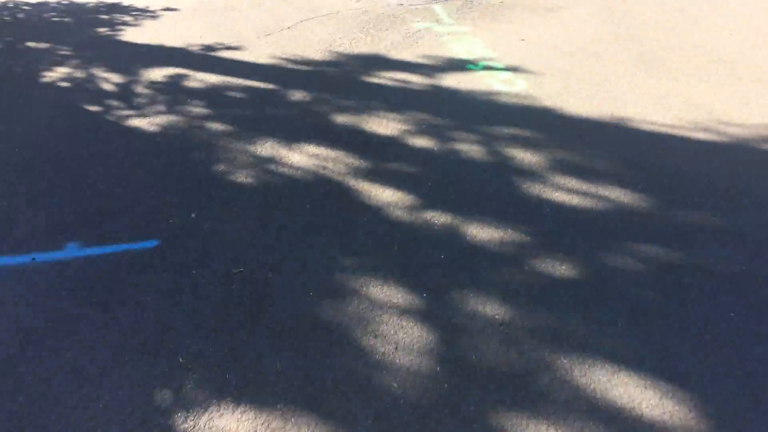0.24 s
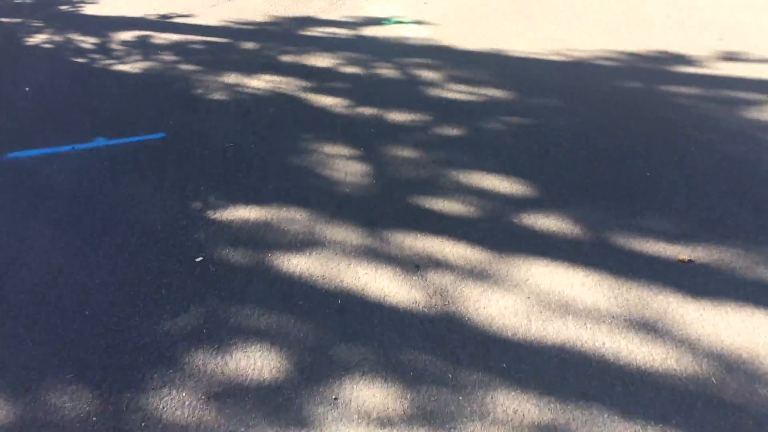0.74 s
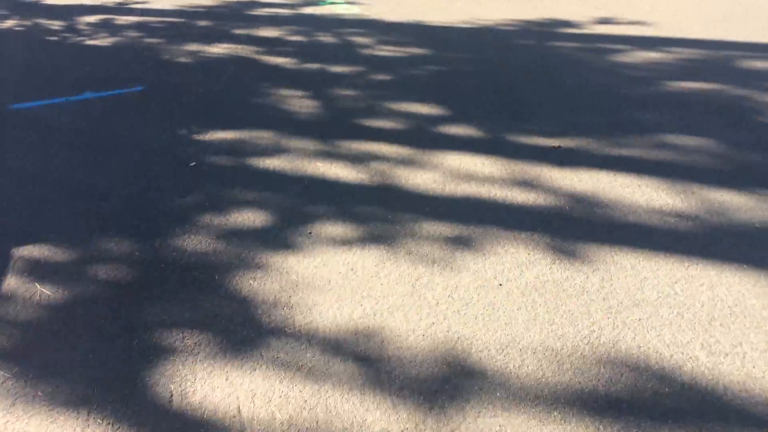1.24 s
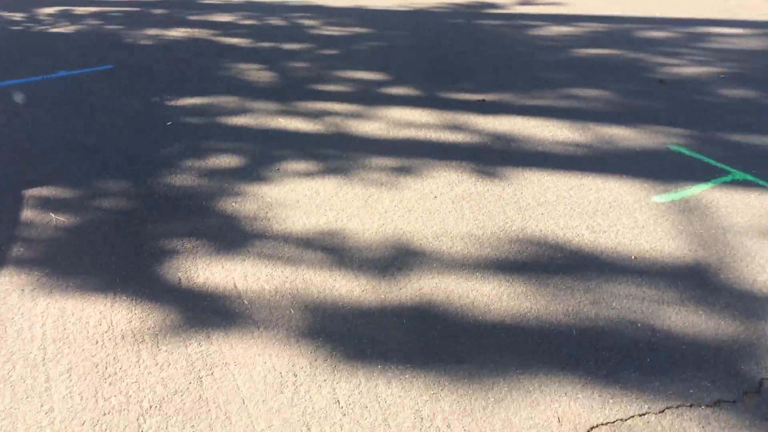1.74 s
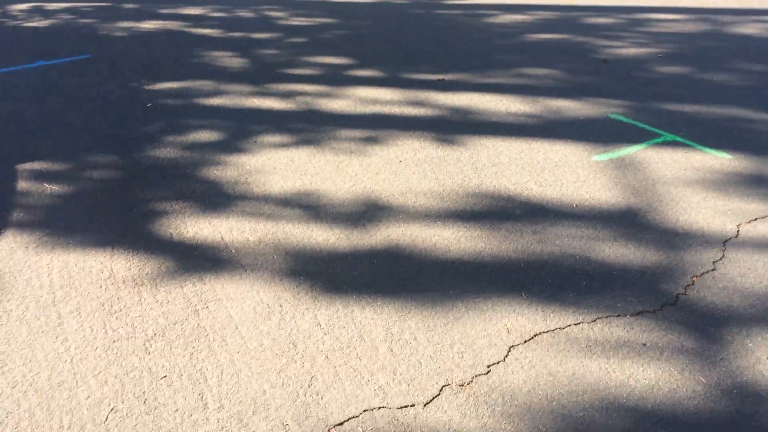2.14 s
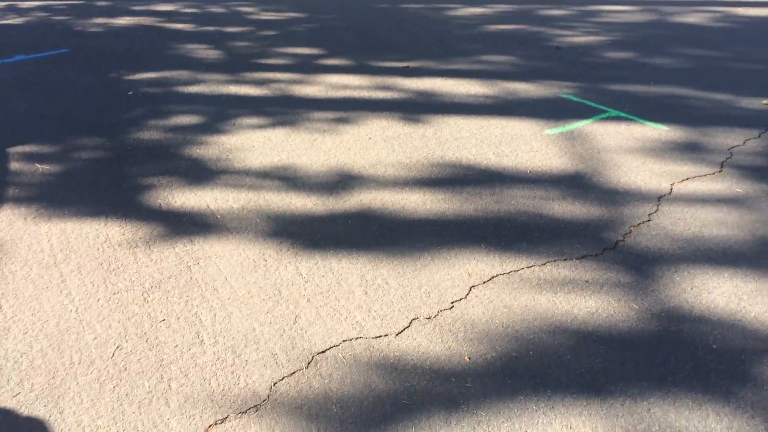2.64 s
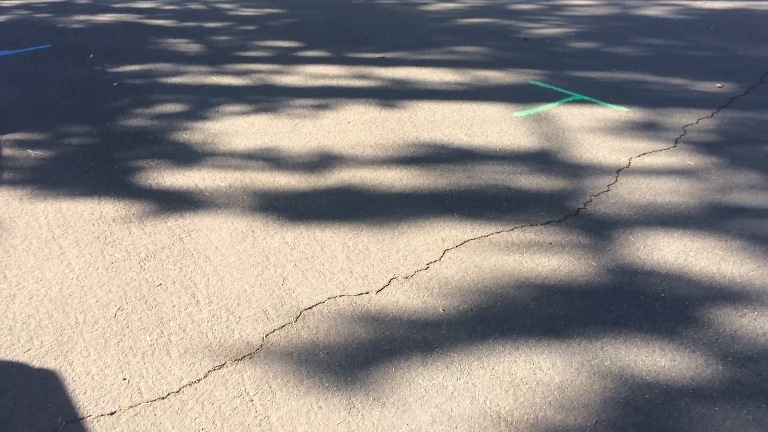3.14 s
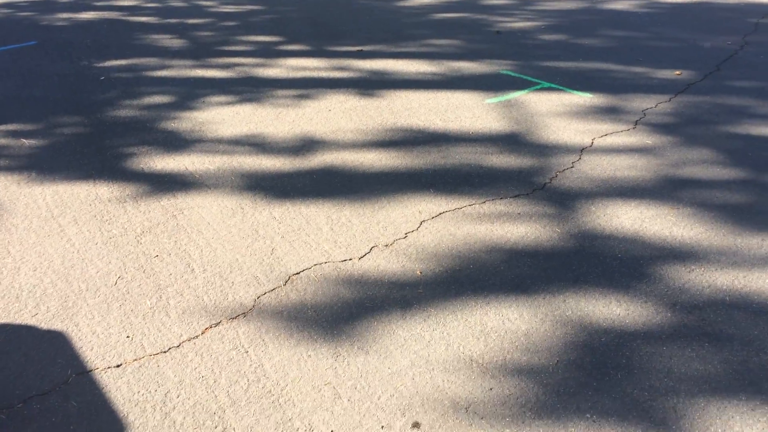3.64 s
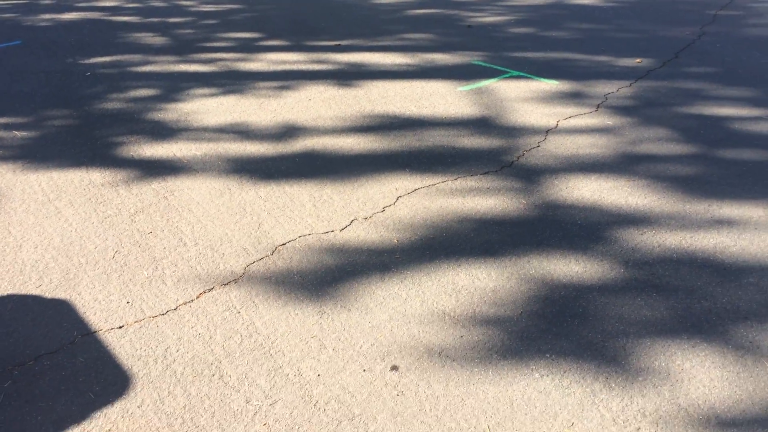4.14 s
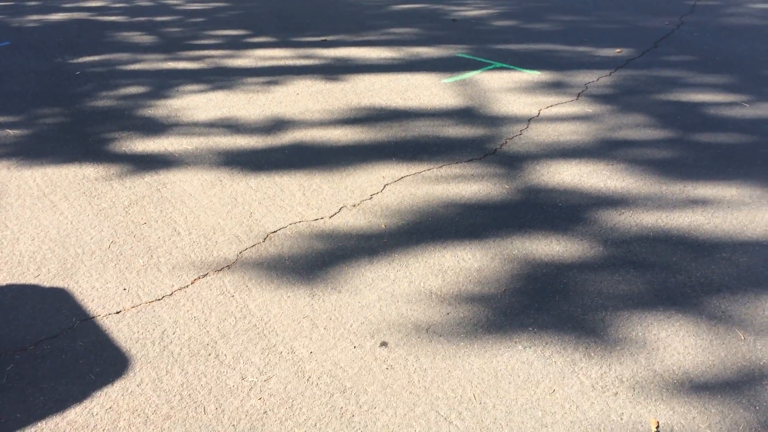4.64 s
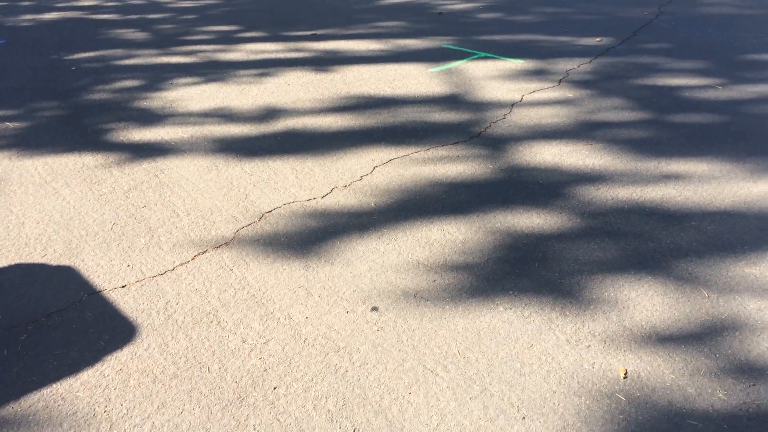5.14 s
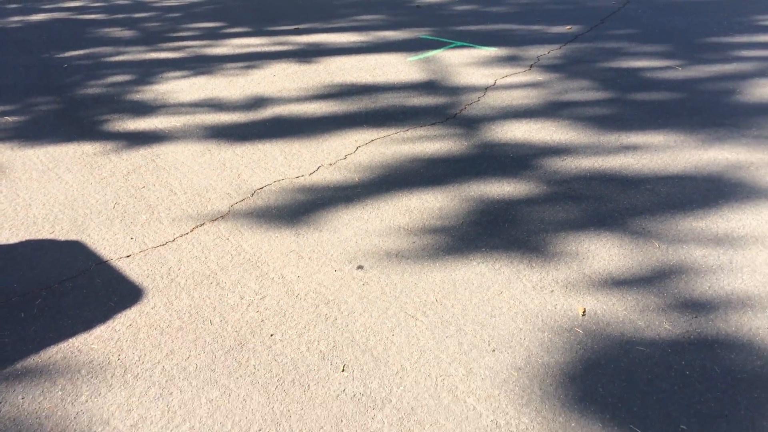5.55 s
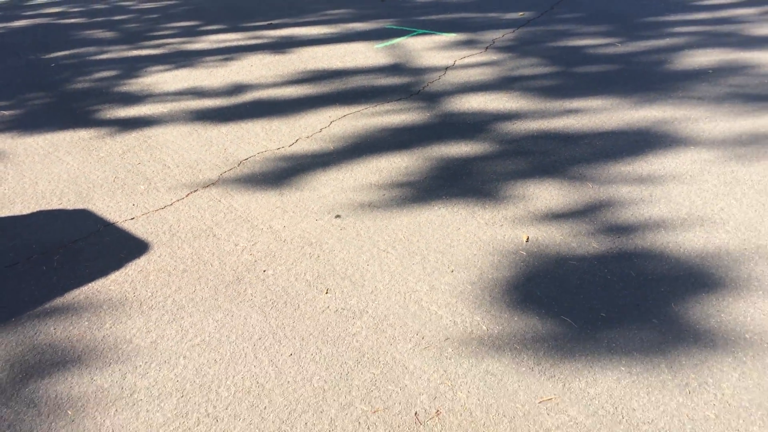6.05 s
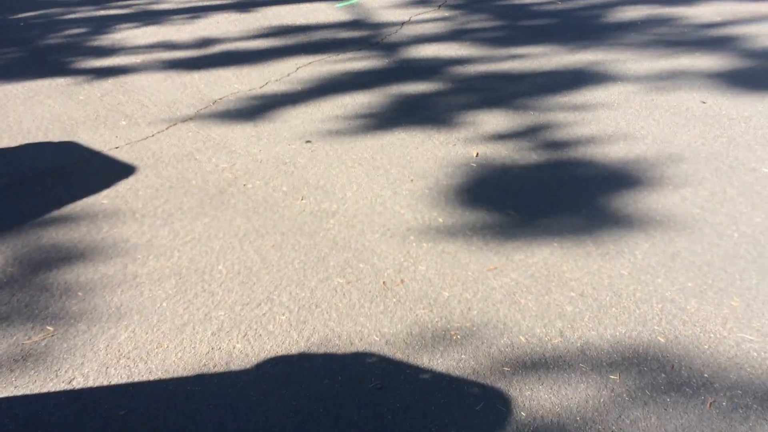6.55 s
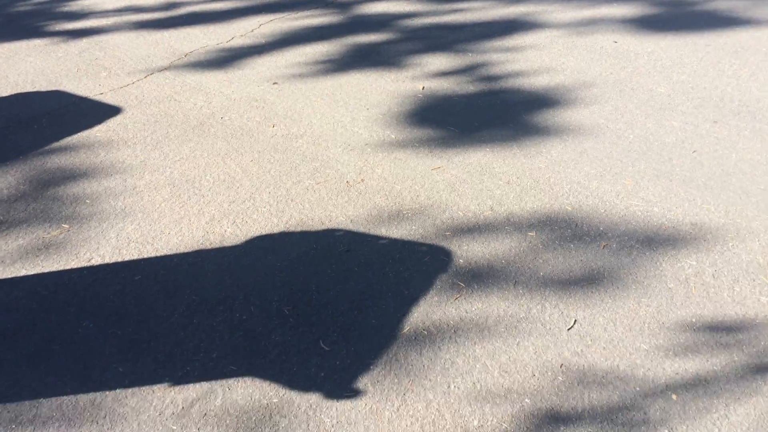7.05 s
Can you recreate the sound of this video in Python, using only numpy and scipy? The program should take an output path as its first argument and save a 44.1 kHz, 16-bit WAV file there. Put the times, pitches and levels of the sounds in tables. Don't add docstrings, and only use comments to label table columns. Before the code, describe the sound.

A small four-cylinder car idles in a lumpy, uneven burble, then revs twice with a raspy exhaust bark and coasts down, recorded by handheld phone outdoors.

```python
import sys
import numpy as np
from scipy import signal
from scipy.fft import rfft, irfft, next_fast_len
from scipy.io import wavfile
from scipy.ndimage import uniform_filter1d, map_coordinates

SR = 44100
rng = np.random.default_rng(int(sys.argv[2]) if len(sys.argv) > 2 else 0)


def attenuation_scalar(level_db):
    decades = np.asarray(level_db, float) / 20
    return 10 ** decades


def store_wav(level_fs):
    pcm = np.round(np.clip(np.atleast_2d(level_fs), -1, 1) * 32767)
    wavfile.write(sys.argv[1], SR, pcm.T.astype(np.int16))


N = 321048


def unit(x):
    return x / np.sqrt(np.mean(x ** 2) + 1e-20)


def along(points, hz):
    f, v = np.transpose(points)
    return attenuation_scalar(np.interp(np.log(hz + 1), np.log(f + 1), v, left=-120))


def curves(rows):
    s, *cols = np.transpose(rows)
    return [np.interp(np.arange(N) / SR, s, c) for c in cols]


def wobble(rate, count=N):
    coarse = np.arange(0, count + 32, 32)
    knots = rng.standard_normal(int(N * rate / SR) + 4)
    return np.interp(np.arange(count), coarse, map_coordinates(knots, [coarse * rate / SR]))


def filtered(x, response):
    m = next_fast_len(len(x) + SR // 2)
    return irfft(rfft(x, m) * response(np.fft.rfftfreq(m, 1 / SR)), m)[:len(x)]


def mode(f, hz, width):
    return 1j * f * width / (hz * hz - f * f + 1j * f * width)


def rush(response, patchy_db):
    z = signal.stft(rng.standard_normal(N), nperseg=512)[2]
    field = uniform_filter1d(rng.standard_normal(z.shape), size=5, axis=0)
    field = uniform_filter1d(field, size=10, axis=1)
    patchy = signal.istft(z * attenuation_scalar(patchy_db * unit(field)), nperseg=512)[1][:N]
    return unit(filtered(patchy, response))


def puffs(train, length_ms, lead_ms):
    u = np.arange(SR // 20) / SR * 1000 / length_ms
    return signal.fftconvolve(train, u * np.exp(1 - u))[round(lead_ms * SR / 1000):][:N]


def placed(pieces):
    out = np.zeros(N + 4 * SR)
    for s, piece in pieces:
        out[round(abs(s) * SR):][:len(piece)] += piece
    return out[:N]


def swell(length, db, edge):
    u = np.arange(round(length * SR)) / (length * SR)
    return attenuation_scalar(db) * np.sin(np.pi / 2 * np.clip(np.minimum(u, 1 - u) / edge, 0, 1)) ** 2


def swells(rows, edge):
    return placed((s, swell(length, db, edge)) for s, length, db in rows)


def sing(hz, gain, waver_hz, rate):
    strength = gain * attenuation_scalar(3.0 + 0.81 * wobble(14, count=len(gain)))
    pitch = hz + waver_hz * wobble(rate, count=len(gain))
    return strength * np.sin(2 * np.pi * np.cumsum(pitch) / SR)


# [t/s, exhaust strokes per s]
SPEED = [(0, 25.16), (.99, 27.48), (1.1, 26.98), (2.588, 26.74), (3.136, 28.57), (3.378, 38.73),
         (3.547, 40.3), (3.725, 49.15), (4.161, 48.23), (4.514, 42.52), (4.737, 47.7), (4.931, 46.55),
         (5.17, 56.86), (5.36, 58.58), (5.719, 43.37), (6.595, 24.14), (6.921, 25.62), (7.28, 39.35)]


def crank():
    return np.cumsum(curves(SPEED)[0]) / SR - .226


# [t/s, level/dB]
PUMPING = [(0, -22), (.4, -20.5), (2.8, -21), (3.1, -22), (3.27, -17.5), (3.48, -21), (3.62, -18.5),
           (4.3, -16.5), (4.6, -21.5), (4.8, -15), (5, -18), (5.15, -14.5), (5.5, -17.5), (5.88, -20),
           (6.17, -25), (6.67, -19.5), (7.17, -16.5), (7.28, -21)]
# [start t/s, end t/s, blast level/dB
# at start, blast level/dB at end]
BURNS = [(0, .49, -21, -24), (.49, 3.16, -19, -17.5), (3.25, 3.335, -15, -17.5), (3.34, 3.61, -7, -11),
         (3.68, 3.85, -25, -21), (4.5, 4.7, -45, -45), (5.07, 5.222, -18.5, -14), (5.3, 5.49, -15.5, -13.5),
         (5.86, 5.92, -22, -21), (6, 6.09, -25, -24), (6.09, 6.33, -28, -28), (6.37, 6.56, -22, -20),
         (6.69, 6.95, -20.5, -17.7), (6.96, 7.04, -21.5, -22.5), (7.05, 7.21, -13.5, -15.5),
         (7.21, 7.35, -12.5, -8)]
# [first t/s, last t/s, blast level/dB under a full burn]
LEAN = [(.01, .01, -9), (.088, .088, -20), (.127, .127, -5.5), (.243, .243, -8.5), (.399, .437, -14),
        (.626, .664, -8), (.815, .815, -6), (.886, .886, -11.5), (1.032, 1.032, -12.5), (1.143, 1.143, -11),
        (1.366, 1.404, -8), (1.441, 1.479, -15), (1.627, 1.627, -12), (1.775, 1.775, -16.5),
        (1.885, 1.885, -7.5), (2.147, 2.222, -8.5), (2.483, 2.596, -7), (2.707, 2.707, -11),
        (2.817, 2.817, -5), (2.889, 2.925, -11), (3.031, 3.031, -9), (3.138, 3.138, -8), (3.4, 3.4, -12),
        (5.106, 5.124, -13), (5.385, 5.385, -17.5), (5.475, 5.475, -16.5), (6.391, 6.426, -8),
        (6.864, 6.864, -12), (7.11, 7.11, -8.5), (7.198, 7.198, -7)]


def strokes():
    turns = crank()
    at = np.searchsorted(turns, np.arange(int(turns[-1]) + 2))
    at[-1] = 2 * at[-2] - at[-3]
    chance = rng.standard_normal((len(at), 3))
    at = at + np.round(8 * chance[:, 0]).astype(int)
    when = at / SR
    push_db = curves(PUMPING)[0][np.minimum(at, N - 1)]
    blast_db = push_db - 14.5
    for s0, s1, db0, db1 in BURNS:
        burning = (when >= s0) & (when < s1)
        blast_db = np.where(burning, np.interp(when, [s0, s1], [db0, db1]), blast_db)
    for s0, s1, db in LEAN:
        first, last = np.argmin(abs(when - s0)), np.argmin(abs(when - s1))
        blast_db[first:last + 1] += db
    push, blast = np.zeros((2, N + SR // 4))
    push[at] = attenuation_scalar(push_db)
    blast[at] = attenuation_scalar(blast_db + .7 * chance[:, 1]) + .07 * attenuation_scalar(push_db) * chance[:, 2]
    return push, blast


# [f/Hz, width/Hz, signed gain for push, signed gain for blast]
PIPE = [(42.6, 8, -13.7, -1), (50.8, 24.6, 6.6, -10.3), (112.8, 25.6, 5.8, 56.4),
        (193.25, 65.4, 19.1, -97.2), (195.43, 50.55, -23.6, 124.7), (293.8, 41, -1.5, -1.6)]
# [rise/ms, lead/ms]
PUSH = (.62, 6.14)
# [rise/ms, lead/ms]
BLAST = (2.55, 9.32)
# [f/Hz, level/dB]
MOUTH = [(8, -3.5), (25, -3), (45, 2.5), (80, 4), (120, 3), (200, 4.5), (260, 5.5), (450, -31), (800, -44),
         (1600, -120)]


def valve(f, pulse):
    rise_ms, lead_ms = pulse
    return np.exp(2j * np.pi * f * lead_ms / 1000) / (1 + 2j * np.pi * f * rise_ms / 1000) ** 3


def exhaust(push, blast):
    thin = lambda f: valve(f, PUSH) * sum(g * mode(f, hz, w) for hz, w, g, _ in PIPE)
    fat = lambda f: valve(f, BLAST) * sum(g * mode(f, hz, w) for hz, w, _, g in PIPE)
    gas = filtered(push, thin) + filtered(blast, fat)
    return attenuation_scalar(28.0) * filtered(gas, lambda f: along(MOUTH, f))[:N]


# [multiple, rms level/dB]
IDLE_ORDERS = [(9, -56), (10, -55), (11, -57), (12, -61), (14, -62), (15, -62), (16, -64), (18, -66),
               (19, -64), (21, -68)]
# [t/s, level/dB]
IDLE_RING = [(0, -7), (.3, -5), (.9, 0), (1.9, 0), (2.3, -2), (2.6, -5), (2.9, -1), (3.2, -1), (3.4, -25),
             (6.3, -25), (6.7, -7), (7.28, -1)]


def idle_ring():
    turns = crank()
    lines = sum(attenuation_scalar(db + 2.5 * wobble(4)) * np.cos(2 * np.pi * k * (turns - .04)) for k, db in IDLE_ORDERS)
    return attenuation_scalar(curves(IDLE_RING)[0]) * np.sqrt(2) * lines


# [f/Hz, level/dB per Hz]
RASP = [(140, -22), (230, -2), (290, -19), (400, -23), (488, -22.5), (602, -24), (743, -23.5),
        (1260, -29.5), (1910, -29), (3120, -49.5), (3520, -41), (15000, -62.5)]
# [f/Hz, level/dB per Hz]
CRACK = [(300, -30), (500, 0), (1000, -4), (2000, -11), (3500, -17), (6000, -19), (9000, -25), (15000, -29)]
# [t/s, level/dB]
SPIT = [(3.349, -10), (3.375, 6), (3.4, 18), (3.426, -5), (3.452, 4), (3.477, 0), (3.503, 4), (3.527, 6),
        (3.552, 5), (3.576, 3), (3.6, 8), (3.625, 26), (7.224, -3.5)]


def rasp(push, blast, rasp_db):
    colour = lambda f: along(RASP, f) / (1 + (f / 900) ** 2) / (1 + (290 / (f + 1)) ** 6)
    dull = rush(colour, patchy_db=1.5)
    gate = puffs((push > 0) * 1., length_ms=2.3, lead_ms=2.6) + 1.0
    force, at = (abs(blast) / 0.52) ** 2.4, np.flatnonzero(push)
    for s, db in SPIT:
        force[at[np.argmin(abs(at - s * SR))]] *= attenuation_scalar(db)
    crack = puffs(force, length_ms=2.2, lead_ms=0) + .2 * puffs(force, length_ms=8, lead_ms=0)
    bright = crack * rush(lambda f: along(CRACK, f), patchy_db=0)
    return attenuation_scalar(rasp_db + 0.5) * unit(gate * dull) + attenuation_scalar(-43.5) * bright


# [f/Hz, width/Hz, level/dB]
CASING = [(1370, 480, -8.5), (2586, 90, -3), (2780, 100, -5.5), (3625, 420, -5), (4170, 240, -4),
          (4560, 190, -6.5), (6360, 690, -15), (9350, 990, -18.5), (13100, 1800, -20)]


def blower(push, hiss_db):
    casing = lambda f: sum((-1) ** k * attenuation_scalar(db) * mode(f, hz, w) for k, (hz, w, db) in enumerate(CASING))
    flutter = 1 + 0.48 * puffs((push > 0) * 1., length_ms=1.4, lead_ms=2.5)
    intake = lambda f: mode(f, 13300, 1600) ** 2 + .5 * mode(f, 10000, 3000) + .7 * mode(f, 7300, 1500)
    fizz = unit(filtered(rng.standard_normal(N), intake))
    hiss = attenuation_scalar(hiss_db - 1 + .6 * wobble(9)) * unit(flutter * rush(casing, patchy_db=1.5))
    return hiss + attenuation_scalar(-67.0) * (curves(SPEED)[0] / 58) ** 8 * fizz


# [f/Hz, level/dB per Hz]
STREET = [(150, -36.5), (250, -12), (282, -6), (346, -9), (496, -13), (676, -22), (736, -16), (1130, -15.5),
          (1490, -13.5), (1740, -20.5), (2360, -19.5), (6840, -40.5), (15000, -52)]
# [f/Hz, level/dB per Hz]
RUMBLE = [(5, -3), (20, 3), (35, 1), (60, -3), (150, -6), (250, -18), (400, -36), (600, -60), (1200, -120)]


def street(street_db):
    high = rush(lambda f: along(STREET, f) * f ** 2 / (f ** 2 + 4500 ** 2), patchy_db=2.5)
    wide = rush(lambda f: along(STREET, f), patchy_db=2.5)
    low = rush(lambda f: along(RUMBLE, f), patchy_db=-3)
    pumping_db, = curves(PUMPING)
    return attenuation_scalar(street_db + 3) * high + attenuation_scalar(-61 + wobble(2)) * wide + attenuation_scalar(pumping_db - 20.5) * low


# [f/Hz, width/Hz, level/dB]
UPPER = [(227.5, 17, 7.5), (309.4, 28.4, 8.5), (332, 50.4, 6.5), (390.6, 48, -3.5), (464, 12, -2.5),
         (590, 45, -7.5), (705, 52, -7.5), (895, 39, -16.5)]
# [t/s, length/s, level/dB]
BARKS = [(0.15, 0.19, -43), (.82, 0.16, -51), (1.33, 0.05, -37), (2.2, 1.9, -56), (3.36, 0.056, -35),
         (3.39, 0.27, -40.5), (3.62, 0.33, -48), (3.7, 1.06, -47.5), (4.72, 0.22, -45), (4.92, 0.22, -47.5),
         (5, 0.78, -49.5), (5.1, 0.18, -45), (5.43, 0.089, -61), (5.45, 0.47, -53.5), (5.75, 0.6, -51.5),
         (6.72, 0.061, -40), (6.78, 0.3, -44)]
# [t/s, length/s, level/dB]
DRONE = [
    (3.6, 0.3, -25.5),
    (4.74, 0.13, -36),
    (5, 0.26, -30),
    (5.5, 0.4, -57),
]


def overtones(push):
    taps = (push > 0) * attenuation_scalar(.7 * rng.standard_normal(len(push)))
    modes = lambda f: -sum((-1) ** k * attenuation_scalar(db) * mode(f, hz, w) for k, (hz, w, db) in enumerate(UPPER))
    pipe = lambda f: modes(f) * f ** 4 / (f ** 4 + 220 ** 4)
    soft = lambda f: pipe(f) / (1 + 1j * f / 1200) ** 2
    ring = unit(filtered(taps, soft)[160:][:N])
    pace = curves(SPEED)[0] / 48
    bright = filtered(ring, lambda f: f ** 8 / (f ** 8 + 500. ** 8))
    bark = (ring + (.55 * pace ** 5 - 1) * bright) * pace ** 1.3
    drone = np.cos(2 * np.pi * (crank() + .4))
    return (attenuation_scalar(-73) + swells(BARKS, edge=0.41)) * bark + swells(DRONE, edge=0.27) * drone


# [t/s, length/s, f/Hz, glide/Hz per s, level/dB]
WHISTLES = [(2.66, 0.25, 3730, -100, -75), (3.622, 0.071, 2560, 2, -67), (3.7, .5, 2820, 46, -75),
            (3.72, 0.45, 4280, -51, -73), (4.14, .38, 4230, -850, -71), (4.25, 0.3, 2710, -600, -68),
            (4.5, .25, 2550, 850, -68), (4.45, 0.65, 2570, -10, -68), (4.7, .26, 2770, -50, -70),
            (4.52, 0.33, 3920, 1000, -71), (4.62, .3, 3520, -2, -74), (5.05, .45, 2560, 6, -70),
            (5.1, 0.17, 3570, 3, -68), (5.45, 0.2, 2560, 200, -69), (5.6, .3, 2740, -800, -68),
            (5.85, 0.35, 2540, 200, -69), (5.55, 0.3, 4150, 300, -73), (5.8, 0.27, 4580, -400, -70),
            (6.2, 0.11, 3700, -100, -70), (6.22, .2, 2700, -300, -71)]


def whistle(length, hz, glide, db):
    gain = swell(length, db, edge=0.14)
    return sing(hz + glide * np.arange(len(gain)) / SR, gain, waver_hz=(hz / 470) ** 2, rate=100)


# [t/s, f/Hz]
PUMP = [(.3, 705), (.6, 714), (.9, 729), (1.25, 719), (1.6, 725), (2.3, 723), (2.65, 736), (2.9, 722),
        (3.15, 694), (4.2, 700)]
# [t/s, length/s, level/dB]
WHINE = [
    (.3, 3.9, -70),
    (.58, .22, -63),
    (.75, .3, -70),
    (1.05, .36, -65),
    (1.48, 0.35, -65),
    (2.02, 0.39, -71),
    (2.52, 0.6, -64),
]
# [t/s, length/s, level/dB]
THIRD = [
    (.35, .3, -75),
    (.75, .6, -73),
    (1.3, .7, -79),
    (1.95, .45, -75),
]
# [f/Hz, width/Hz, level/dB]
TONES = [(1512, 14, -73.5), (2357, 39, -76), (12200, 160, -91), (13050, 100, -86.5), (13650, 100, -87.5)]


def whine():
    idle_db, = curves([(.3, -8), (.8, 0), (2.6, -1), (3.3, -7), (3.6, -22), (6.4, -18), (7, -12)])
    bands = lambda f: sum(attenuation_scalar(db) * mode(f, hz, w) ** 2 * np.sqrt(SR / w) for hz, w, db in TONES)
    hums = attenuation_scalar(idle_db) * filtered(rng.standard_normal(N), bands)
    whistles = placed((s, whistle(*row)) for s, *row in WHISTLES)
    pump_hz, = curves(PUMP)
    first = sing(pump_hz, swells(WHINE, edge=0.17), waver_hz=5, rate=16)
    third = sing(3 * pump_hz, swells(THIRD, edge=.3), waver_hz=4, rate=11)
    return first + third + whistles + hums


# [t/s, peak level/dB, centre f/Hz, spread/octaves, length/ms]
HANDLING = [(0.336, -47, 2000, 0.6, 28), (0.334, -54, 6500, 0.5, 30), (1.704, -50, 653, .4, 6),
            (3.437, -52, 9200, 0.7, 6.6), (3.49, -54, 7000, .7, 5), (5.435, -48, 900, .6, 5),
            (5.817, -48, 800, .6, 8), (6.491, -52, 11000, 0.7, 14), (6.493, -45, 2200, 0.8, 16),
            (6.502, -51, 7000, 1.1, 2), (6.543, -43, 1000, 0.25, 3.1), (6.72, -53, 1350, 0.27, 100),
            (6.613, -54, 8440, 0.5, 1.5), (6.617, -56, 8000, 0.4, 1.9), (6.647, -59, 7000, 0.54, 2),
            (6.682, -58, 7000, 0.4, 1.5), (6.716, -54, 8540, 0.4, 1.6), (6.720, -57, 8600, 0.48, 1.2),
            (6.751, -36, 480, 0.6, 6), (6.75, -56, 5000, .8, 6), (6.98, -42, 424, 0.23, 26),
            (7.142, -50, 1200, .7, 5)]


def handling():
    out = np.zeros(N + SR)
    t = np.arange(SR // 8) / SR
    for s, db, hz, octaves, ms in HANDLING:
        band = lambda f: np.exp(-.5 * (np.log2((f + 1) / hz) / octaves) ** 2)
        grit = filtered(rng.standard_normal(len(t)), band)
        burst = grit * np.exp(-(t * 1000 / ms) ** 3) * np.minimum(t * 4000 / ms, 1)
        out[round(s * SR):][:len(t)] += attenuation_scalar(db) * burst / abs(burst).max()
    return out[:N]


# [t/s, level/dB]
FLOW = [(0, -56), (1.55, -59.5), (2.4, -63.5), (3.18, -65), (3.31, -51), (3.51, -43.5), (3.85, -55),
        (4.14, -59), (4.52, -60), (4.76, -53.5), (4.95, -55), (5.28, -49), (5.52, -57), (6.37, -56),
        (6.57, -54), (6.93, -54), (7.28, -53)]
# [t/s, hiss level/dB]
BELTS = [(0, -64.5), (.7, -66), (2.4, -74.5), (3.25, -67), (3.75, -72.5), (4.15, -66), (4.76, -60),
         (5.6, -60.5), (6.35, -64), (6.7, -70.5), (7.28, -74)]


def scene():
    push, blast = strokes()
    flow_db, = curves(FLOW)
    hiss_db = curves(BELTS)[0] + 1.9 * wobble(3)
    clatter_db = -69 + 0.49 * (flow_db + 54.5)
    car = exhaust(push, blast) + overtones(push) + idle_ring()
    car = car + rasp(push, blast, flow_db) + blower(push, hiss_db) + whine()
    return (car + street(clatter_db) + handling())[None]


def roll_off(x):
    return signal.sosfilt(signal.butter(12, 15300, fs=SR, output="sos"), x)


def record(dry):
    return roll_off(dry)


dry = scene()
out = record(dry)
store_wav(out)
```